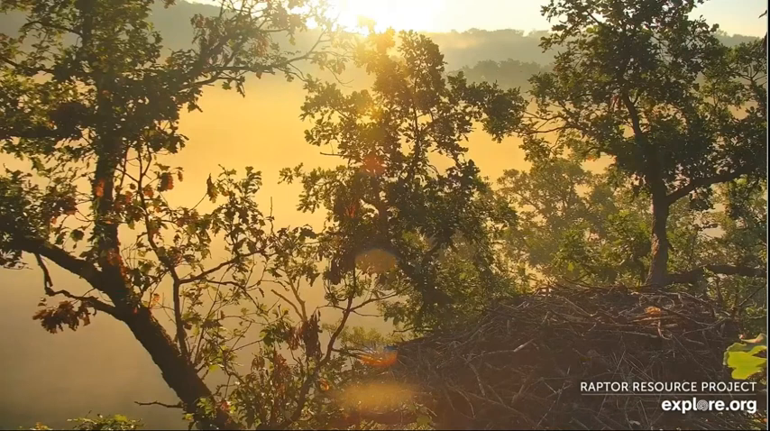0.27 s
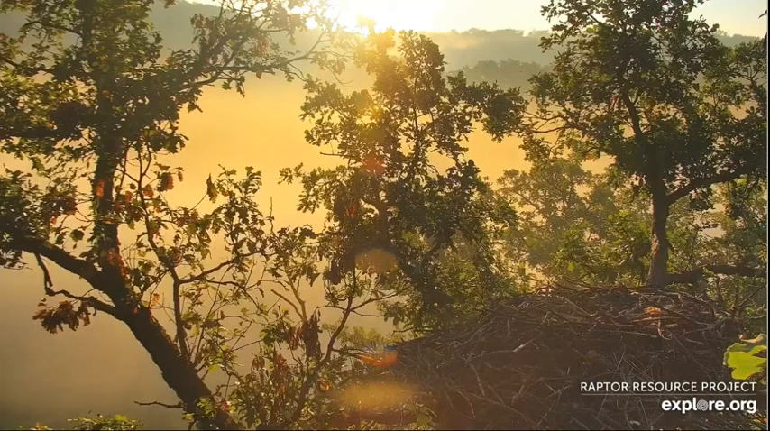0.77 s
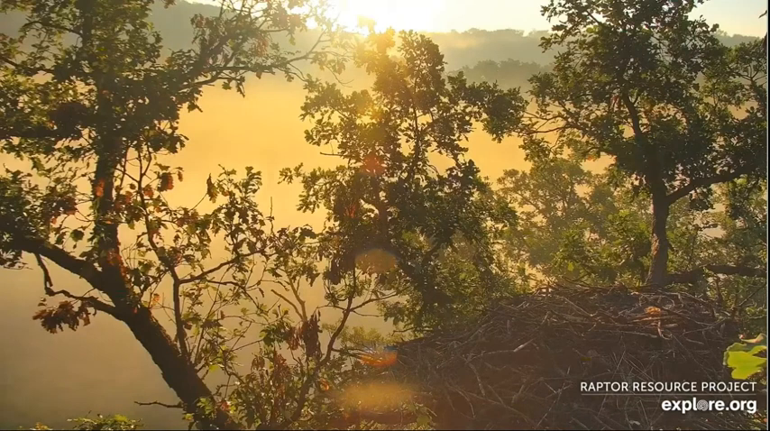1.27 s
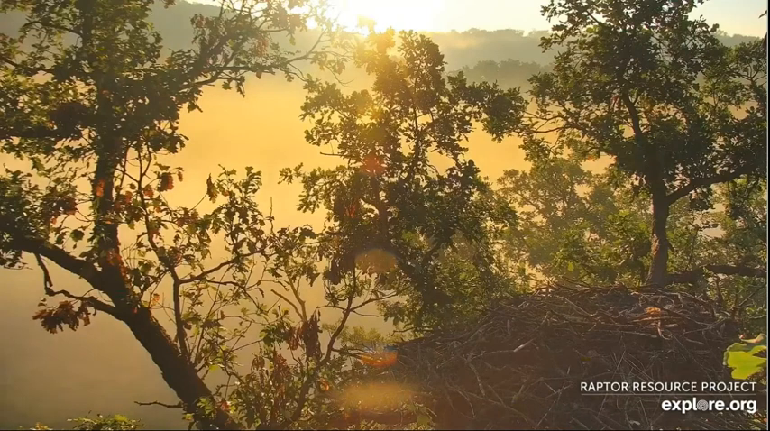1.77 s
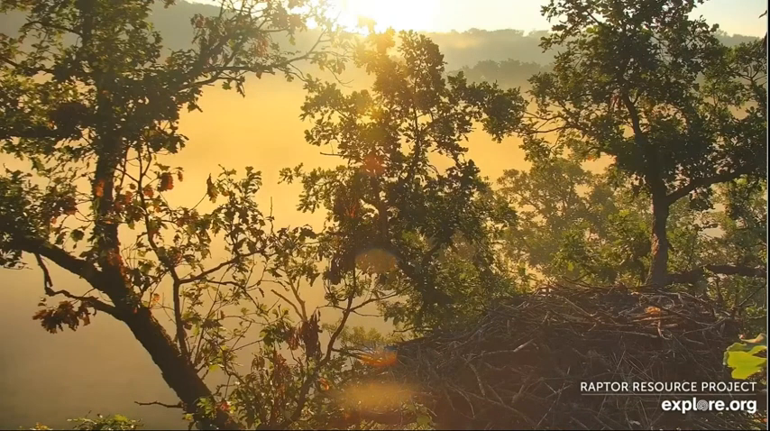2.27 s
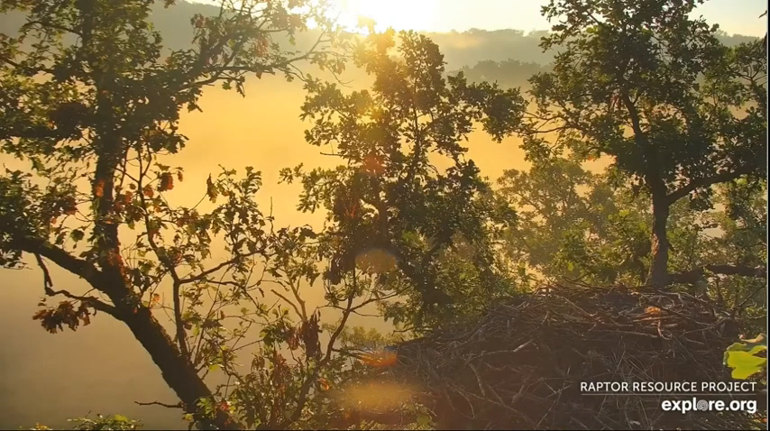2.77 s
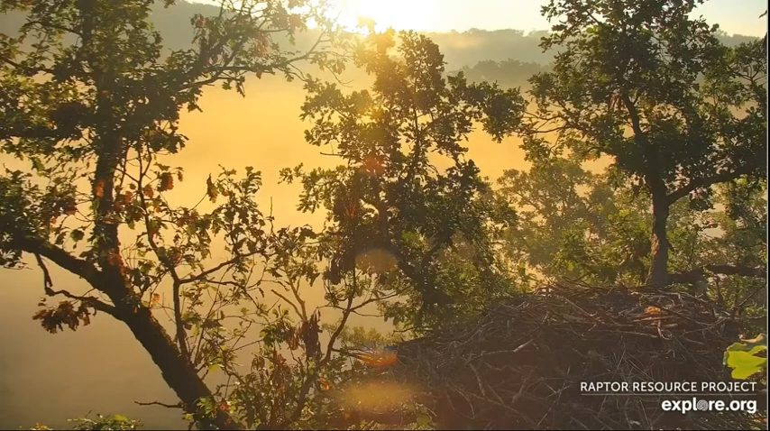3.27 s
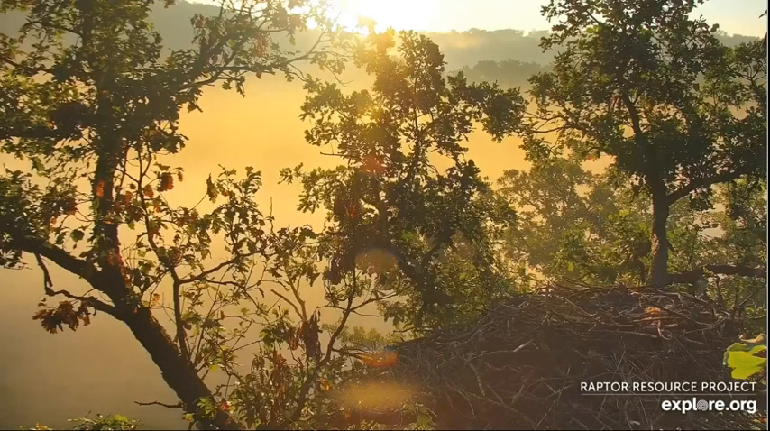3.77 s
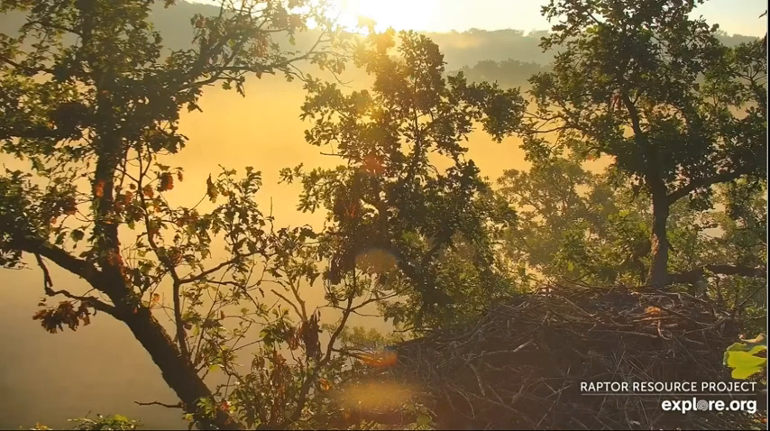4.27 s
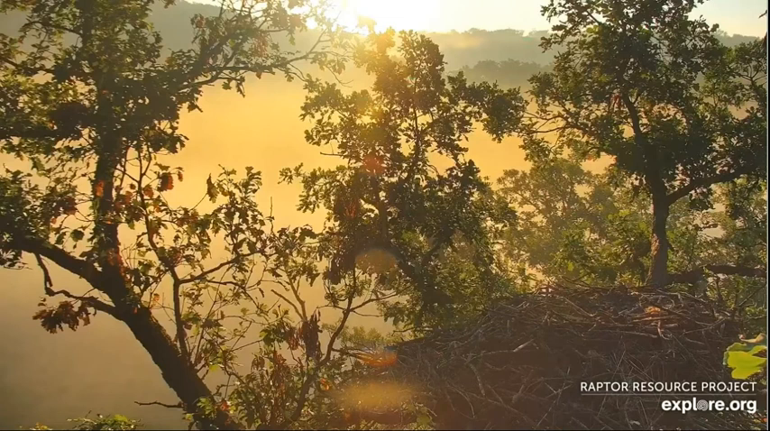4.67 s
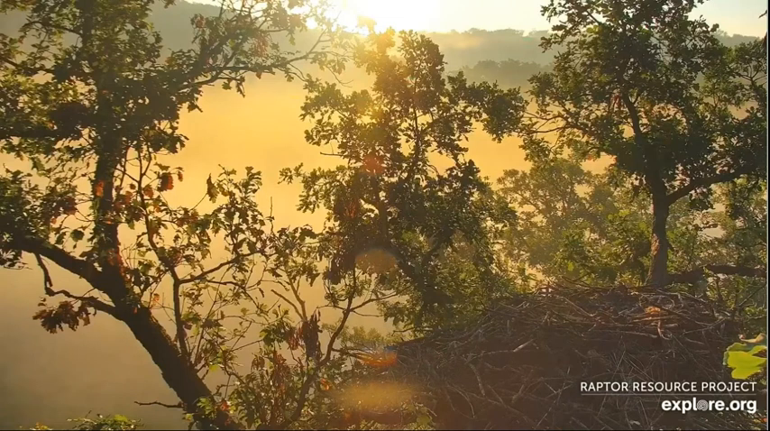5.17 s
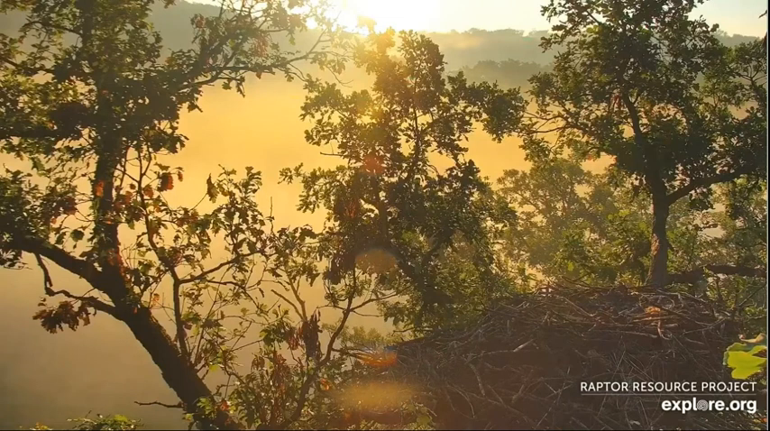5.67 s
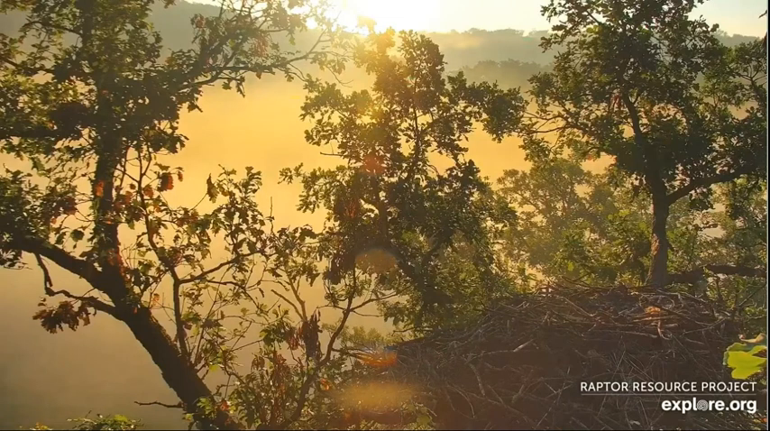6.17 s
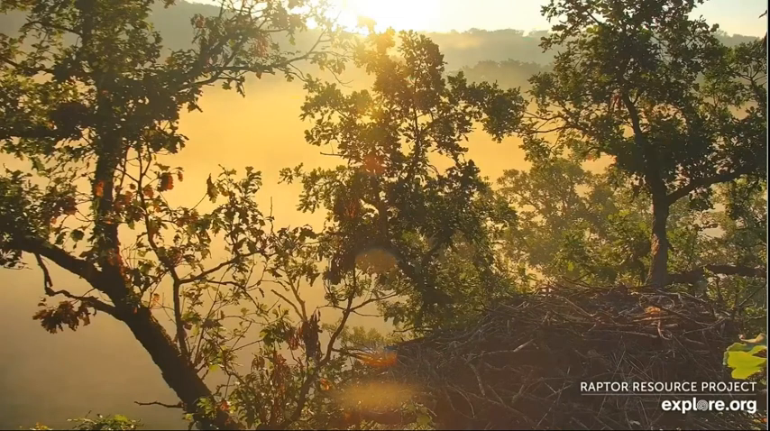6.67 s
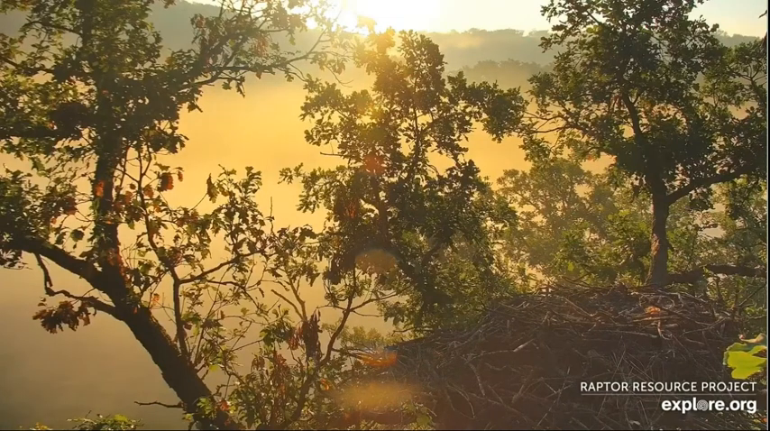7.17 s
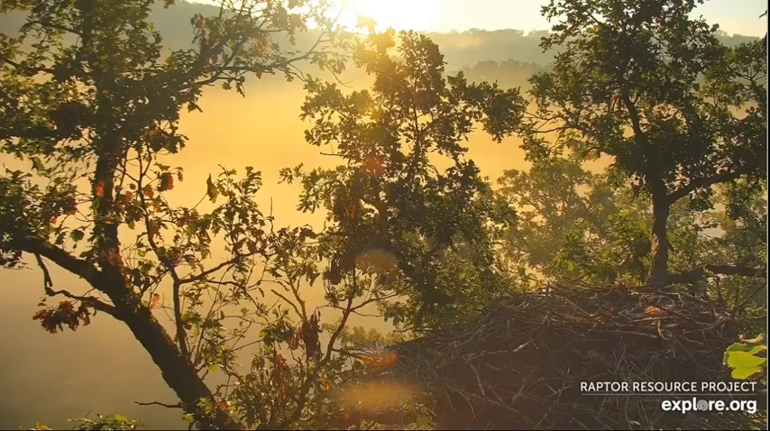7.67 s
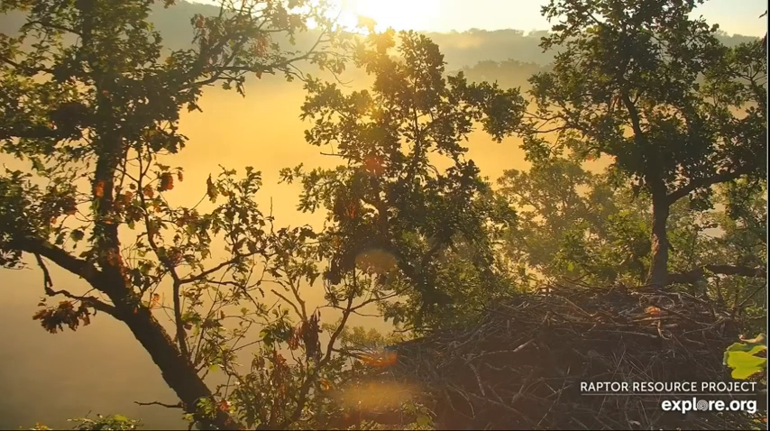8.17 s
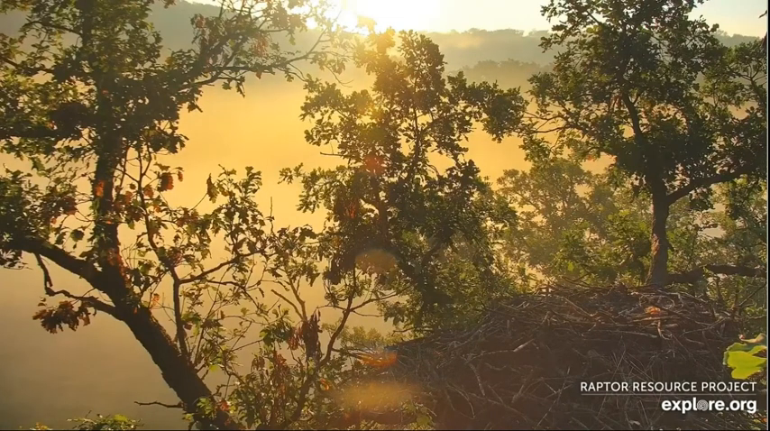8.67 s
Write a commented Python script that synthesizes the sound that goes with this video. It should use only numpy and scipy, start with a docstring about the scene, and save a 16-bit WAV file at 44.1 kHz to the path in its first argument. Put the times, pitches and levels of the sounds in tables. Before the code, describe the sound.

Outdoor microphone in a treetop: a deep, even hum with far rumble and light hiss, and quick bird slurs near and far from the start. Thin, very high two-toned calls join in, then a single soft woody thump. Towards the end a far cow groans and bellows while buzzy high notes seesaw between two pitches, before a final nearby bird phrase.

```python
"""Dawn in a valley, heard from high in a tree over a low hum, a far rumble and microphone hiss (shaped noise).
From the start small birds chirp, whistle and twitter in the echoing canopy: gliding tones with noise-like tails.
Thin two-voiced calls join from 2.8 s; at 4.7 s something knocks once on wood: decaying modes and a scuff.
From 6.3 to 8.2 s a distant cow moos, groan to bellow: fold harmonics through throat and mouth, with a far echo.
Buzzes seesaw between two pitches from 7.6 s; the nearest bird, singing since 0.3 s, sings last after the moo."""
import sys
import numpy as np
from scipy import signal
from scipy.fft import rfft, irfft, next_fast_len
from scipy.io import wavfile
from scipy.ndimage import map_coordinates

SR = 44100
rng = np.random.default_rng(int(sys.argv[2]) if len(sys.argv) > 2 else 0)


def wrap_up_sound(samples):
    """Save the sound to the file named by the first command line argument, as 16-bit audio."""
    columns = np.atleast_2d(samples).T
    # keep every value between -1 and 1, then stretch to whole-number steps
    tamed = np.clip(columns, -1, 1)
    steps = np.round(tamed * 32767).astype(np.int16)
    wavfile.write(sys.argv[1], SR, steps)


N = 392490


def amp(db):
    """Decibels to gain."""
    return 10 ** (np.asarray(db) / 20)


def unit(x):
    """Scale to rms 1."""
    return x / np.sqrt(np.mean(x ** 2) + 1e-20)


def along(points, hz):
    """(f/Hz, value) points interpolated on a log frequency axis."""
    f, v = np.transpose(points)
    return np.interp(np.log(hz + 1), np.log(f + 1), v)


def curve(points):
    """(t/s, value) points interpolated to one value per sample."""
    s, v = np.transpose(points)
    return np.interp(np.arange(N) / SR, s, v)


def wobble(rate_hz, size=N):
    """Smooth random curve, rate_hz knots a second."""
    knots = rng.standard_normal(int(size * rate_hz / SR) + 4)
    return map_coordinates(knots, [np.arange(size) * rate_hz / SR])


def tone(hz):
    """Sine that follows a frequency path."""
    return np.sin(2 * np.pi * np.cumsum(hz) / SR)


def filtered(x, response):
    """x through a gain that is a function of frequency."""
    m = next_fast_len(N + SR // 2)
    return irfft(rfft(x, m) * response(np.fft.rfftfreq(m, 1 / SR)), m)[:N]


def noise(spectrum):
    """Gaussian noise of the given density in dB per Hz."""
    return filtered(rng.standard_normal(N), lambda hz: np.sqrt(SR / 2) * amp(along(spectrum, hz)))


def add(track, s, sound):
    """Mix a sound into the track at time s."""
    part = track[max(round(s * SR), 0):][:len(sound)]
    part += sound[:len(part)]


def echoes(x, t60_s, wet_db):
    """Direct sound plus scatter from trunks and leaves: a decaying noise tail."""
    t = np.arange(SR * 3 // 4) / SR
    onset = 1 - np.exp(-t / .008)
    tail = rng.standard_normal(len(t)) * amp(-60 * t / t60_s) * onset
    wet = signal.fftconvolve(x, tail / np.linalg.norm(tail))
    return np.pad(x, (0, len(t) - 1)) + amp(wet_db) * wet


# microphone self-noise: f/Hz, density/dB per Hz
HISS_SPECTRUM = [(2100, -107), (3000, -104.5), (6500, -103.6), (10000, -100.8), (13000, -97.8),
                 (15500, -96.3)]


def hiss():
    """Microphone self-noise: even in time, rising with frequency."""
    return noise(HISS_SPECTRUM)


# valley rumble before its swell: f/Hz, density/dB per Hz
RUMBLE_SPECTRUM = [(20, -75), (32, -71), (55, -61.5), (110, -54.5), (200, -61.5), (330, -65.5),
                   (450, -72.5), (570, -80), (750, -86.5), (1000, -91), (1250, -97), (1500, -98),
                   (1800, -108.4), (2600, -125.4)]


def rumble(swell_db=.5):
    """Low noise of the valley that swells a little."""
    return amp(swell_db * wobble(4)) * noise(RUMBLE_SPECTRUM)


# drone tones before their waver: f/Hz, rms level/dB
HUM_TONES = [(96.9, -30), (122, -46.5)]


def hum(drift_rad=0.79, waver_db=1.6):
    """Far machinery: sines with slow random phase and level."""
    t = np.arange(N) / SR
    out = np.zeros(N)
    for hz, db in HUM_TONES:
        level = np.sqrt(2) * amp(db + waver_db * wobble(5.1))
        out += level * np.sin(2 * np.pi * hz * t + drift_rad * wobble(1.32))
    return out


def chirps(rows, bend, t60_s, wet_db, gain_db=0):
    """Each chirp: one pure tone, a half-sine swell, sliding along a bent path."""
    out = np.zeros(N)
    for s, length_s, start_hz, end_hz, db in rows:
        u = np.linspace(0, 1, max(int(length_s * SR), 2))
        hz = start_hz + (end_hz - start_hz) * u ** bend + 55 * wobble(224, len(u))
        note = np.abs(np.sin(np.pi * u)) * tone(hz)
        add(out, s, echoes(amp(db + gain_db) * note, t60_s, wet_db))
    return out


def whistles(rows, scoop=0.074, scoop_s=0.0097, arch=0.018):
    """Notes scoop up to an arched pitch; fast flutter of the syrinx makes some buzz."""
    out = np.zeros(N)
    for s, length_s, pitch_hz, db, buzz_hz in rows:
        t = np.arange(max(int(length_s * SR), 2)) / SR
        swell = np.abs(np.sin(np.pi * t / t[-1]))
        path = 1 - scoop * np.exp(-t / scoop_s) + arch * (swell - .7)
        hz = pitch_hz * path + buzz_hz * wobble(500, len(t))
        note = np.sqrt(swell) * tone(hz)
        add(out, s, echoes(amp(db) * note, t60_s=.6, wet_db=-4))
    return out


def repeated(runs):
    """One note repeated at an even pace: one row per note."""
    return [(s + k * step_s, *note) for s, notes, step_s, *note in runs for k in range(round(notes))]


# bouts of far birds: t/s, length/s, centre f/Hz, notes per s, mean level/dB before gain
TWITTER_BOUTS = [(0, 8.9, 3420, 6, -66), (3.081, .55, 3290, 38, -60.5), (3.15, .3, 2375, 26, -67),
                 (5.037, 0.54, 2780, 15, -67.5), (6.2, .7, 3100, 14, -70), (7, .9, 3046, 46, -68.5)]


def twitter(gain_db=-1, pitch_spread=0.123, level_spread_db=3):
    """Far birds: randomly scattered short slurs, most of them falling, blurred by the trees."""
    rows = []
    for s, length_s, pitch_hz, rate_hz, db in TWITTER_BOUTS:
        for when, high, slide, loud in rng.uniform(-1, 1, (int(length_s * rate_hz), 4)):
            hz = pitch_hz * (1 + pitch_spread * high)
            fall = .1 * (slide + .6)
            start_s = s + length_s * (when + 1) / 2
            rows.append((start_s, .026, hz * (1 + fall), hz * (1 - fall), db + level_spread_db * loud))
    return chirps(rows, bend=1, t60_s=.45, wet_db=-1, gain_db=gain_db)


SEESAW_S, SEESAW_STEP_S, SEESAW_NOTE_S = 7.59, .143, .2
SEESAW_HIGH_HZ, SEESAW_LOW_HZ, SEESAW_BUZZ_HZ, SEESAW_DB = 7103, 5810, 351, -62.5


def seesaw(count=6, last_db=-5, flutter_db=3.1):
    """Far buzzes alternate between two pitches and run together in the trees; the last is softer."""
    rows = []
    for k in range(count):
        hz = SEESAW_LOW_HZ if k % 2 else SEESAW_HIGH_HZ
        db = SEESAW_DB + last_db * (k == count - 1)
        rows.append((SEESAW_S + k * SEESAW_STEP_S, SEESAW_NOTE_S, hz, db, SEESAW_BUZZ_HZ))
    buzzes = whistles(rows) * amp(flutter_db * wobble(45))
    return echoes(buzzes, t60_s=0.98, wet_db=-5)[:N]


# two-voiced calls: t/s, length/s, level/dB, upper voice re lower/dB
THIN_CALL_ROWS = [(2.789, 0.33, -52, -3), (4.147, 0.41, -59.5, -6), (5.563, 0.38, -58.5, -7)]


def thin_calls(lower_hz=7350, upper_hz=8800, droop=0.086, quiver_hz=60, flutter_db=3):
    """Both sides of the syrinx whistle at once on a quivering arch that sags at the end."""
    out = np.zeros(N)
    for s, length_s, db, upper_db in THIN_CALL_ROWS:
        u = np.linspace(0, 1, int(length_s * SR))
        arch = 1 - droop * (u - .36) ** 2
        swell = np.abs(np.sin(np.pi * u ** .7)) ** .4
        for pitch_hz, voice_db in (lower_hz, 0), (upper_hz, upper_db):
            hz = pitch_hz * arch + quiver_hz * wobble(198, len(u))
            level = amp(db + voice_db + flutter_db * wobble(120.4, len(u)))
            add(out, s, echoes(level * swell * tone(hz), t60_s=.8, wet_db=-4))
    return out


# lone notes and one brief tick: t/s, length/s, f/Hz, level/dB, buzz depth/Hz
LONE_NOTES = [(0, .16, 4320, -56, 155), (.264, 0.27, 3680, -61, 97), (.421, 0.14, 1563, -63, 4),
              (.479, 0.18, 4140, -58, 97), (.65, 0.15, 4420, -56.5, 11), (1.302, 0.73, 7060, -68.5, 100),
              (1.99, 0.063, 4240, -51, 70), (3.33, .073, 3935, -58.5, 10), (3.359, .008, 1590, -54, 5),
              (3.79, .065, 3050, -63, 10), (3.87, 0.21, 5330, -58, 350), (3.9, .17, 2550, -69, 30),
              (4.045, 0.34, 5680, -59, 620), (4.4, 0.1, 2480, -63, 54), (4.53, .12, 2400, -66, 55),
              (4.636, 0.21, 4960, -60, 51), (4.821, 0.07, 4380, -54.5, 200), (4.836, .13, 6050, -59, 85),
              (5.568, 0.24, 5840, -68, 65), (6.192, 0.54, 4170, -66.5, 86), (7.008, .066, 6250, -60, 31),
              (7.34, 0.19, 4820, -64.5, 44), (7.501, 0.11, 6050, -63, 53)]


def lone_notes():
    """Lone whistles from clear to buzzing, and a short low tick at 3.36 s."""
    return whistles(LONE_NOTES)


# runs of upslurs: t/s, notes, step/s, note length/s, start f/Hz, end f/Hz, peak level/dB
RISING_RUNS = [(3.799, 1, .1, 0.033, 3650, 4340, -49), (4.36, 4, 0.11, 0.041, 2980, 4390, -49),
               (5.5, 1, .1, 0.11, 2350, 3040, -73), (6.791, 3, .138, .026, 3280, 3960, -60)]


def rising_runs():
    """Upslurs that climb fastest at first."""
    return chirps(repeated(RISING_RUNS), bend=.8, t60_s=.45, wet_db=-4.5)


# runs of downslurs: t/s, notes, step/s, note length/s, start f/Hz, end f/Hz, peak level/dB
FALLING_RUNS = [(.665, 1, .1, .043, 3630, 2750, -50.5), (.803, 3, 0.13, .058, 3660, 2380, -47.5),
                (.667, 1, .1, 0.046, 7070, 5500, -50.5), (1.506, 3, .092, 0.028, 3600, 2600, -65),
                (1.762, 1, 0.089, 0.053, 3510, 2990, -55.5), (1.779, 1, .1, .037, 6650, 5440, -58),
                (1.948, 1, .1, .052, 5100, 4100, -41.5), (2.01, 2, .123, 0.059, 3890, 2490, -55.5),
                (2.338, 4, .194, .036, 4350, 2830, -61), (3.03, 5, .124, .056, 3630, 2710, -61),
                (3.676, 1, .1, .045, 2490, 1980, -64), (3.861, 2, .084, 0.017, 6000, 4100, -52),
                (4.088, 2, 0.12, .021, 5800, 4180, -50), (4.031, 3, .116, 0.0163, 3830, 2470, -56),
                (6.705, 1, .1, .032, 5750, 5100, -60), (7.126, 8, .102, 0.017, 3400, 2700, -62),
                (3.12, 2, 0.14, .05, 2650, 2050, -70)]


def falling_runs():
    """Downslurs that drop ever faster."""
    return chirps(repeated(FALLING_RUNS), bend=1.7, t60_s=.4, wet_db=-7)


SLUR_S, SLUR_START_HZ, SLUR_END_HZ = 0.054, 3720, 5230  # first upslur of a song
SLUR_SAG, SLUR_FADE_DB, SLUR_SLOWING = 0.028, 0.1, 1.1  # per note: lower, softer, later
LEAD_S, LEAD_LENGTH_S, LEAD_BUZZ_HZ = .138, 0.076, 45  # whistle: time ahead of the slurs, length, buzz
# nearest bird: first slur t/s, slurs, first step/s, first slur level/dB, whistle f/Hz, whistle level/dB
SONG_ROWS = [(0.436, 1, .15, -48, 5670, -52), (1.18, 2, .16, -48.5, 5720, -54),
             (2.242, 2, 0.15, -48.5, 5780, -51.5), (3.521, 2, 0.13, -48, 5800, -54.5),
             (5.321, 3, .126, -48, 5810, -52.5), (8.26, 3, 0.15, -50.5, 5900, -56)]


def songs():
    """Nearest bird: a short high whistle leads into upslurs that sink, soften and slow down."""
    leads, slurs = [], []
    for s, notes, step_s, db, lead_hz, lead_db in SONG_ROWS:
        leads.append((s - LEAD_S, LEAD_LENGTH_S, lead_hz, lead_db, LEAD_BUZZ_HZ))
        for k in range(round(notes)):
            sag = 1 - SLUR_SAG * k
            slurs.append((s, SLUR_S, SLUR_START_HZ * sag, SLUR_END_HZ * sag, db - SLUR_FADE_DB * k))
            s = s + step_s * SLUR_SLOWING ** k
    return whistles(leads) + chirps(slurs, bend=.85, t60_s=0.47, wet_db=-2.5)


# blow: t/s, level/dB before gain, applied to the summed modes
KNOCK_BLOWS = [(4.699, -23)]
# wood modes: f/Hz, relative level/dB, t60/s
WOOD_MODES = [(209, 12, 0.052), (236, 6, 0.088), (310, -19, 0.031)]
# scuff, later scaled to rms 1: f/Hz, relative density/dB per Hz
SCUFF_SPECTRUM = [(300, -12), (520, -1), (780, -1), (950, -14), (2000, -40)]


def knock(gain_db=-3, attack_s=0.0034, scuff_db=-49):
    """A soft blow rings the low modes of wood; a brief noise scuff follows."""
    out, t = np.zeros(N), np.arange(SR // 3) / SR
    modes = sum(amp(db - 60 * t / t60_s) * np.sin(2 * np.pi * hz * t) for hz, db, t60_s in WOOD_MODES)
    ring = modes * (1 - np.exp(-t / attack_s))
    scuff = unit(noise(SCUFF_SPECTRUM))[:len(t)] * np.exp(-((t - .05) / .035) ** 2)
    for s, db in KNOCK_BLOWS:
        add(out, s, amp(db + gain_db) * ring + amp(scuff_db) * scuff)
    return out


MOO_ATTACK_S, MOO_RELEASE_S = .12, 0.079  # time to swell and to die by 40 dB
GROAN_DB, GROAN_END_S = 10.5, 7.15  # slack folds favour the fundamental until the cow starts to push
PRESS_S, PRESS_WIDTH_S, PRESS_DB = 7.4, 0.14, -18  # pressed folds starve it just before the bellow
TWANG_HZ, TWANG_WIDTH_HZ, TWANG_DB = 1880, 180, 21.5  # and add a nasal twang
BREAK_S, BREAK_JITTER = 0.026, 0.052  # pitch turns ragged as the breath runs out
BLUFF_DELAY_S, BLUFF_DB = .22, -27.5  # the moo's echo across the valley
# fold pitch before jitter: t/s, f/Hz
MOO_PITCH_PATH = [(6.25, 70.6), (6.328, 69.27), (6.454, 74.12), (6.688, 74.16), (7.056, 80.75),
                  (7.422, 102.4), (7.59, 117.4), (7.8, 159.7), (7.904, 171.5), (8.03, 174.9),
                  (8.066, 164.7), (8.114, 130.6), (8.13, 130.4)]
# effort before gain: t/s, level/dB
MOO_EFFORT_PATH = [(6.38, -41), (6.426, -32.5), (7.004, -42), (7.152, -29.5), (7.276, -28.5), (7.578, -26),
                   (7.712, -17.5), (8.026, -12), (8.094, -14)]
# mouth: t/s, opening 0-1
MOUTH_PATH = [(6.8, 0.2), (7.1, 0.44), (7.28, 0.17), (7.501, 0.36), (7.57, 0.87), (7.72, 0.32),
              (7.85, 0.52), (8.04, 0.21)]
# throat and muzzle response: f/Hz, relative level/dB
THROAT_RESPONSE = [(70, -2), (120, -3), (175, 0), (205, -2.5), (235, -18), (285, -17), (335, -27),
                   (420, -23), (520, -31.5), (650, -34), (825, -42.5), (885, -58), (1000, -56), (1220, -44),
                   (1400, -43), (1540, -70), (1750, -69), (1950, -71), (2300, -95)]


def cow(jitter=0.0039, rasp_db=-13, mouth_db=10, closed_hz=555, travel_hz=350, width_hz=70,
        resonance_db=8, strain=0.44, uneven_db=2.0, gain_db=1):
    """Fold harmonics glide through the throat; an opening mouth brightens them and raises its resonance."""
    t = np.arange(N) / SR
    start_s, end_s = MOO_EFFORT_PATH[0][0], MOO_EFFORT_PATH[-1][0]
    outside = np.maximum((start_s - t) / MOO_ATTACK_S, (t - end_s) / MOO_RELEASE_S)
    on = outside < 1
    pitch_hz, effort_db, mouth = (curve(p)[on] for p in (MOO_PITCH_PATH, MOO_EFFORT_PATH, MOUTH_PATH))
    effort_db = effort_db - 40 * np.maximum(outside[on], 0)
    t, size = t[on], len(pitch_hz)

    slack_s = [t[0], (t[0] + GROAN_END_S) / 2, GROAN_END_S - .1, GROAN_END_S]
    slack = np.interp(t, slack_s, [-1, 1, 1, 0])
    press = np.exp(-((t - PRESS_S) / PRESS_WIDTH_S) ** 2)
    fundamental_db = GROAN_DB * slack + PRESS_DB * press
    ragged = BREAK_JITTER * np.exp(-((t - end_s) / BREAK_S) ** 2) * wobble(150, size)
    phase = 2 * np.pi * np.cumsum(pitch_hz * (1 + jitter * wobble(50, size) + ragged)) / SR

    voice = np.zeros(size)
    for k in range(1, 25):
        hz = k * pitch_hz
        opening_db = mouth_db * (mouth - .4) * np.clip((hz - 250) / 400, 0, 1)
        formant_db = resonance_db / (1 + ((hz - closed_hz - travel_hz * mouth) / width_hz) ** 2)
        # a harder push snaps the folds shut: a brighter top
        strain_db = strain * np.maximum(effort_db + 11, -10) * np.clip((hz - 850) / 250, 0, 1)
        twang_db = TWANG_DB * press ** .25 * np.exp(-((hz - TWANG_HZ) / TWANG_WIDTH_HZ) ** 2)
        # each overtone wavers by itself
        own_db = fundamental_db if k == 1 else uneven_db * wobble(8.41, size)
        total_db = along(THROAT_RESPONSE, hz) + opening_db + formant_db + strain_db + twang_db + own_db
        rasp = 1 + amp(rasp_db) * min(k / 3, 1) * wobble(90, size)  # least on the fundamental
        lag_rad = rng.uniform(0, np.pi / 2)  # nearly in step: one pulse per cycle
        voice += amp(total_db) * rasp * np.sin(k * phase + lag_rad)

    out = np.zeros(N)
    moo = echoes(np.sqrt(2) * amp(effort_db + gain_db) * voice, t60_s=.45, wet_db=-21)
    add(out, t[0], moo)
    add(out, t[0] + BLUFF_DELAY_S, amp(BLUFF_DB) * moo)
    return out


def scene():
    """Background, birds, knock and cow at one microphone."""
    background = hiss() + rumble() + hum()
    far_birds = twitter() + seesaw()
    birds = far_birds + thin_calls() + lone_notes() + rising_runs() + falling_runs() + songs()
    return (background + birds + knock() + cow())[None]


TOP_HZ = 15780


def record(dry):
    """Band limit: nothing at or above TOP_HZ passes."""
    return filtered(dry[0], lambda hz: hz < TOP_HZ)[None]


dry = scene()
out = record(dry)
wrap_up_sound(out)
```